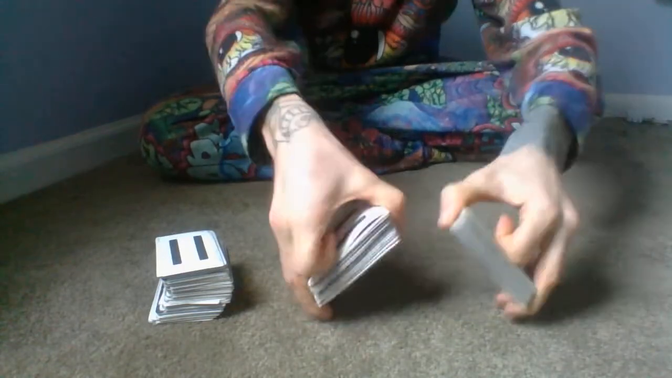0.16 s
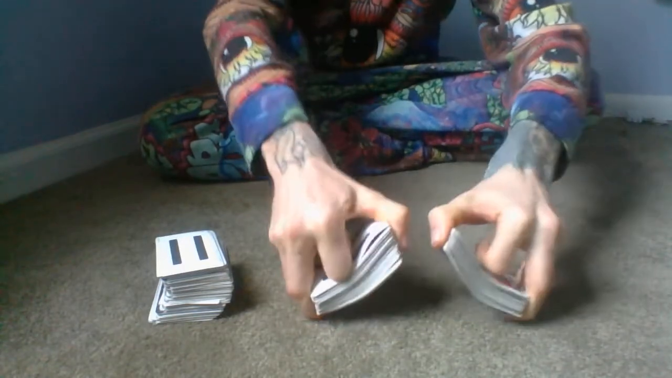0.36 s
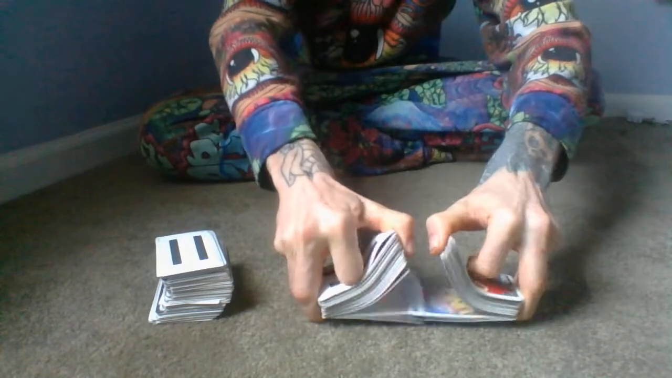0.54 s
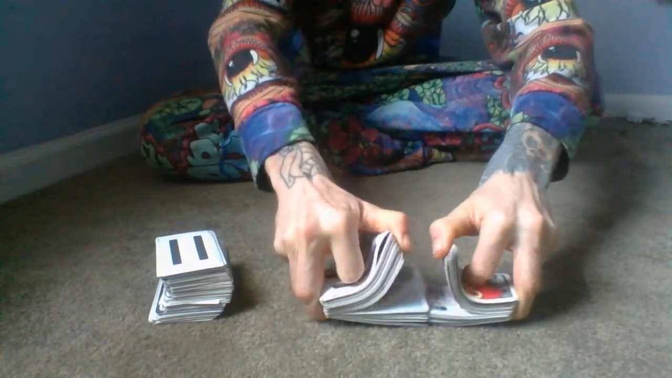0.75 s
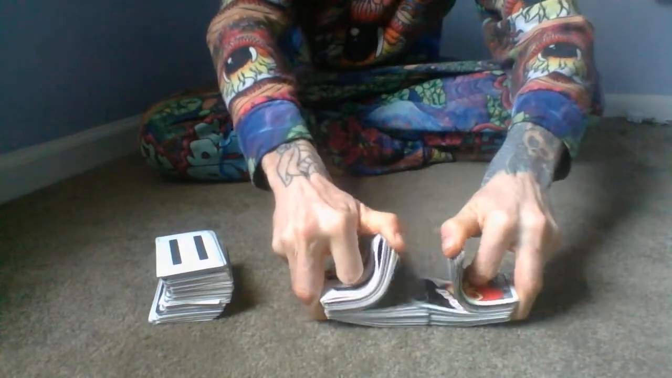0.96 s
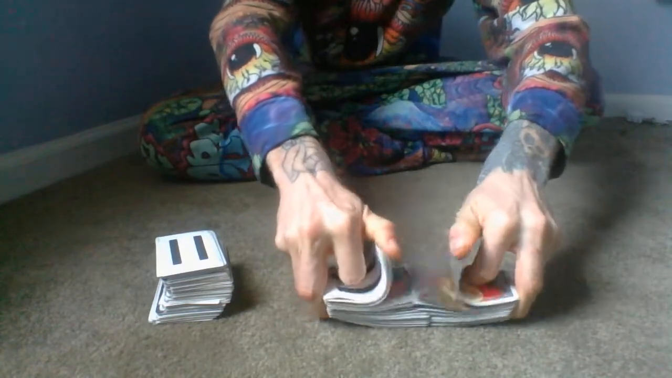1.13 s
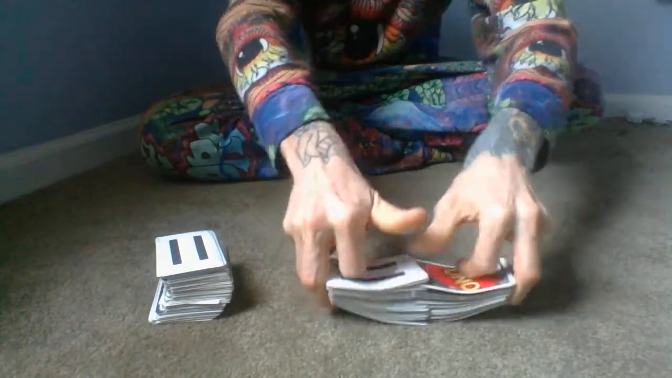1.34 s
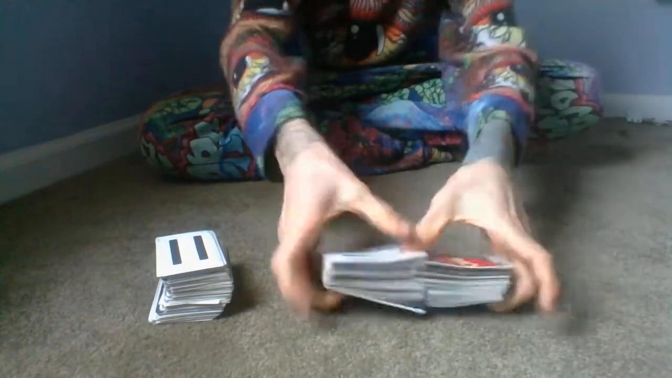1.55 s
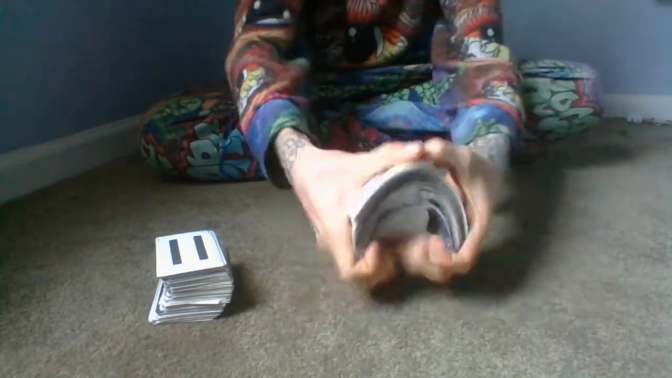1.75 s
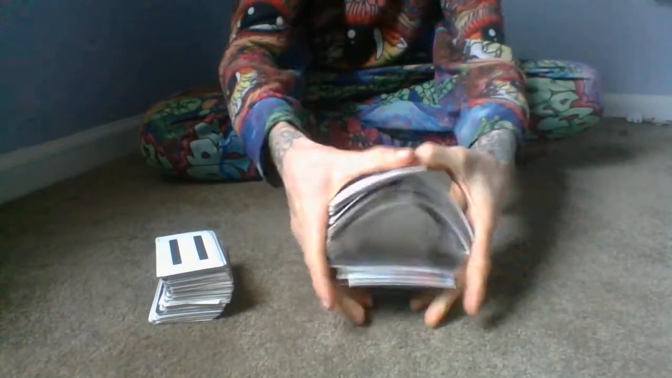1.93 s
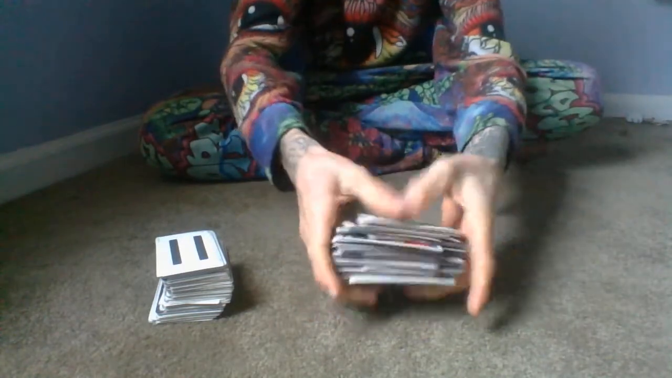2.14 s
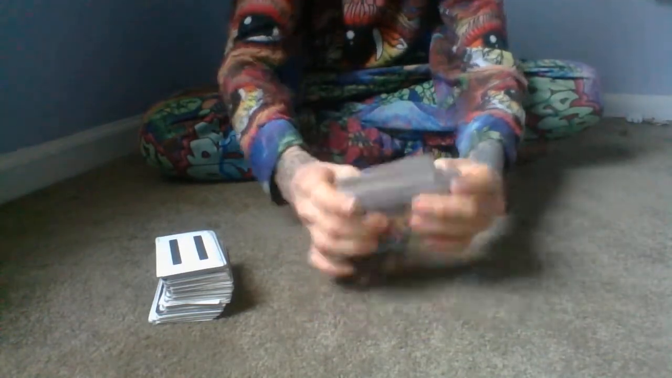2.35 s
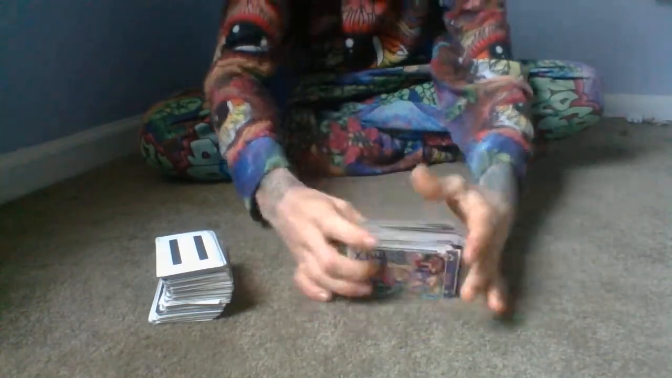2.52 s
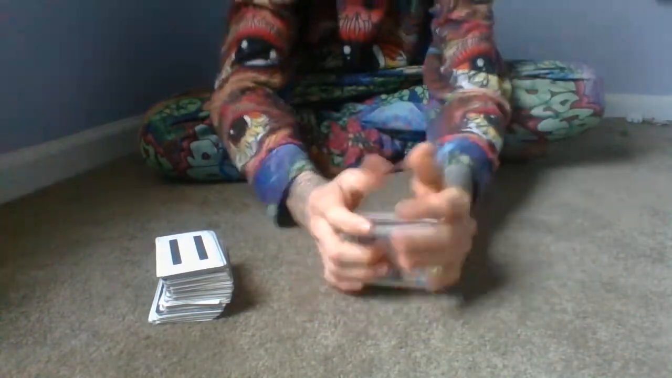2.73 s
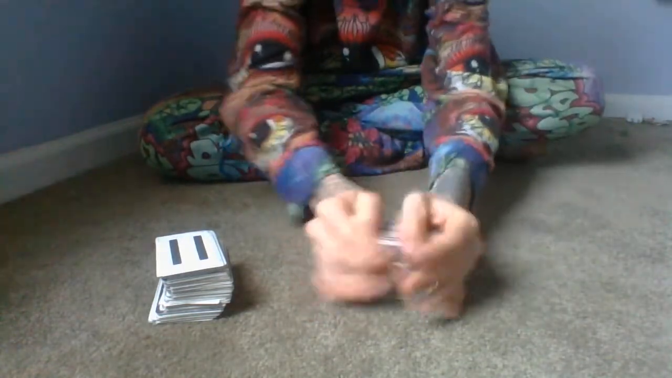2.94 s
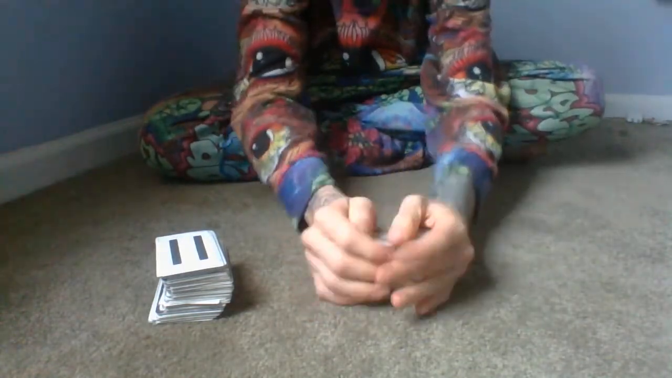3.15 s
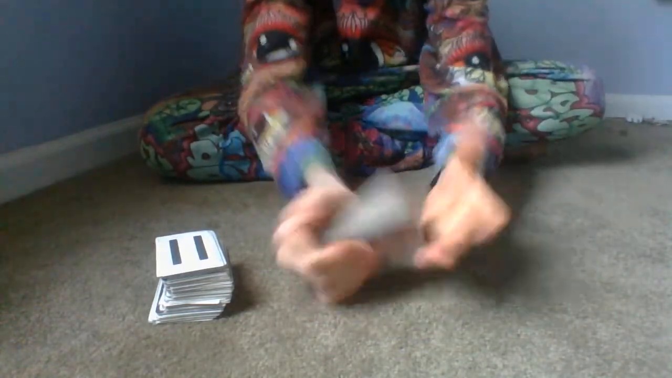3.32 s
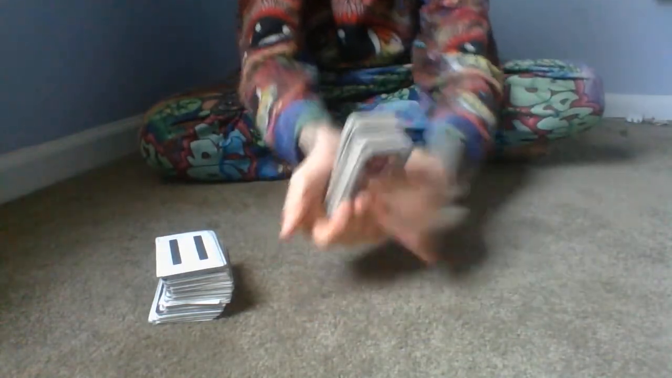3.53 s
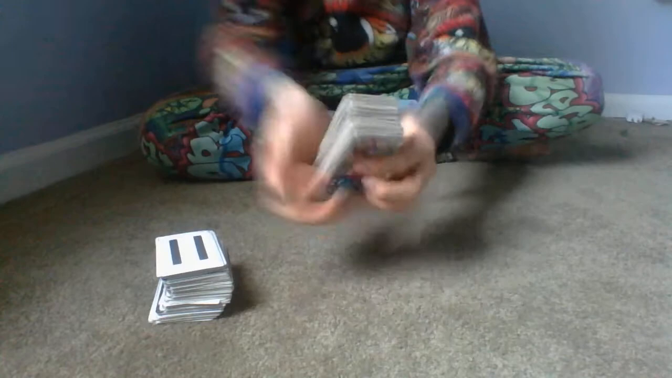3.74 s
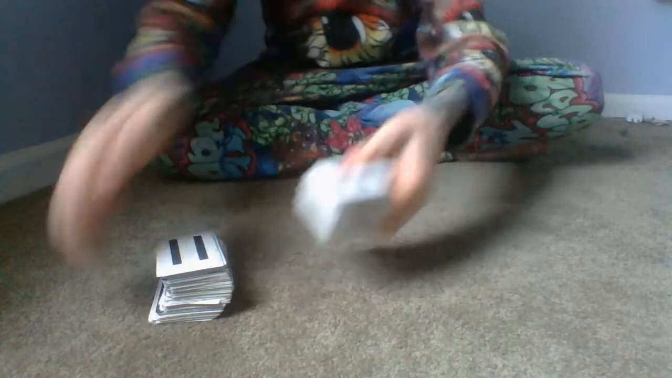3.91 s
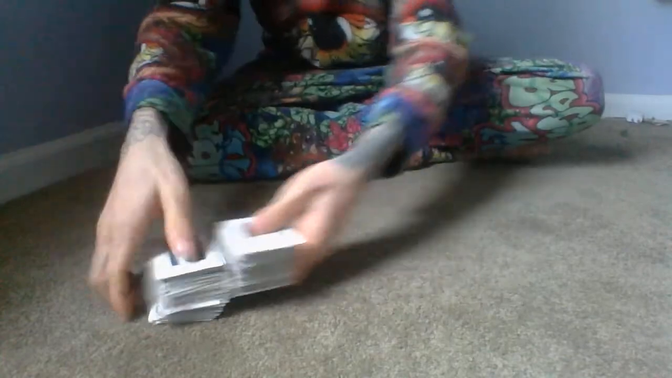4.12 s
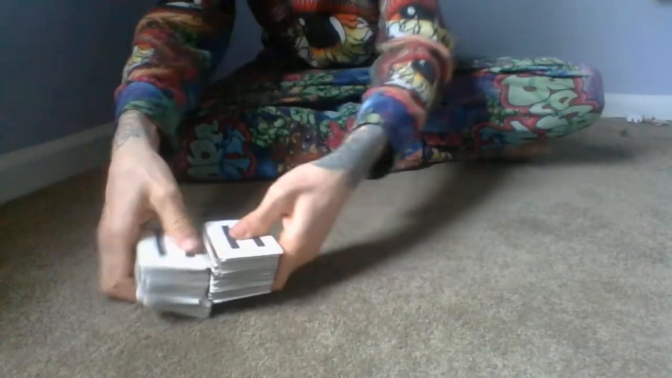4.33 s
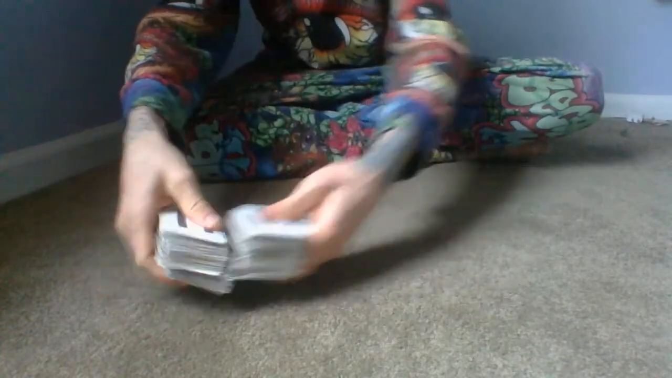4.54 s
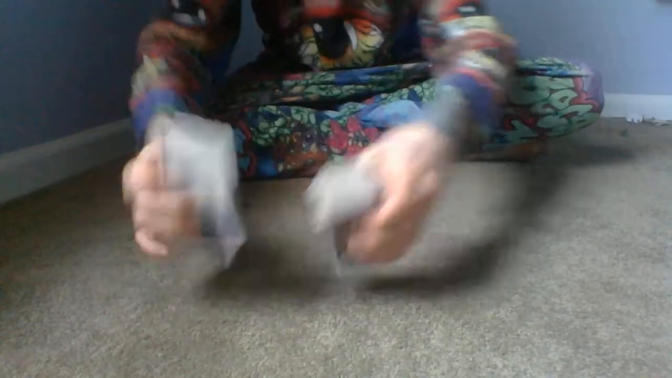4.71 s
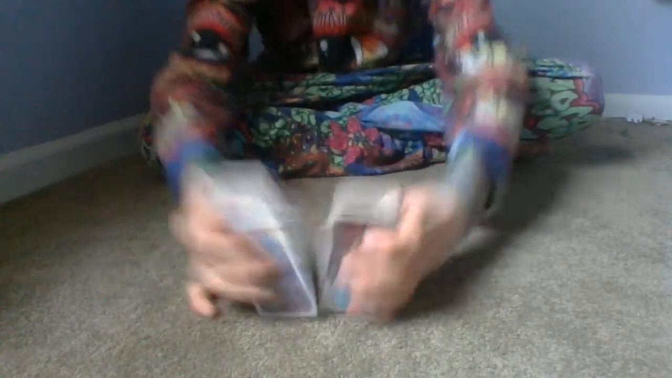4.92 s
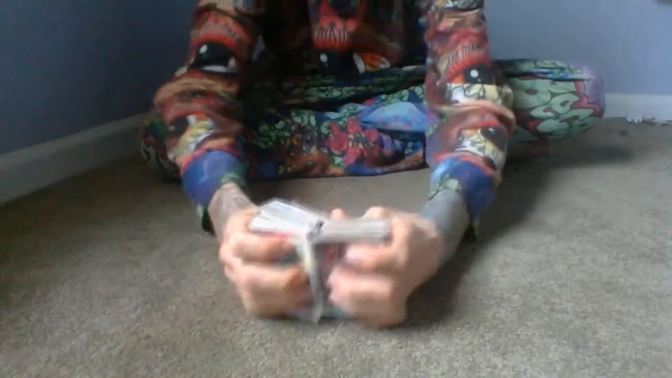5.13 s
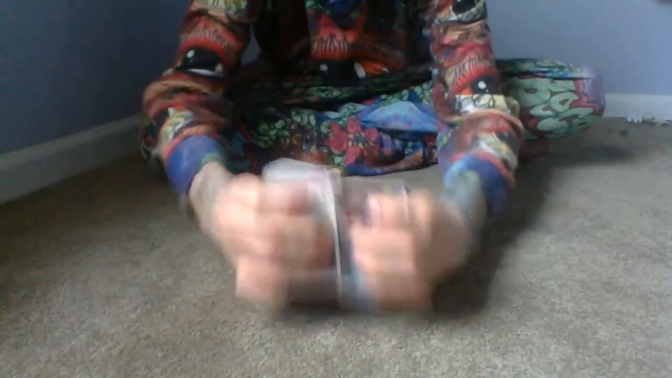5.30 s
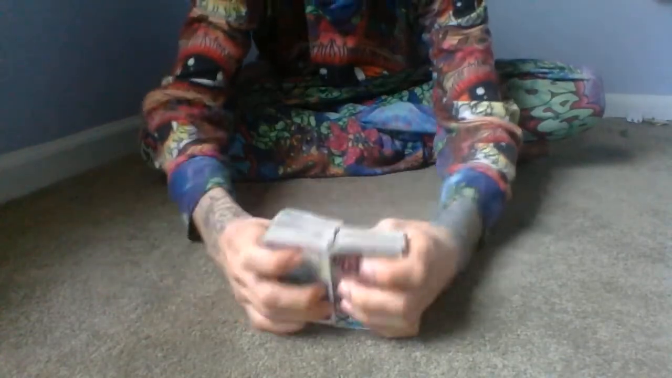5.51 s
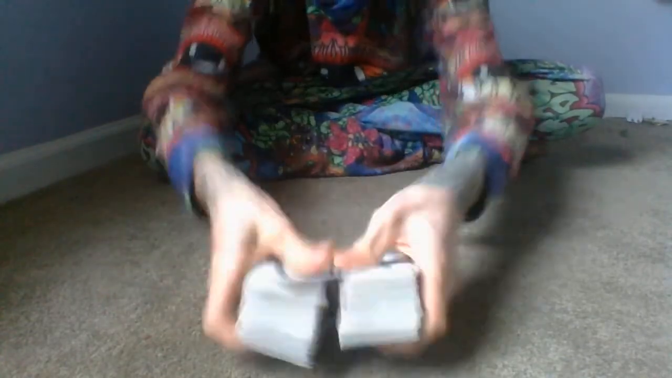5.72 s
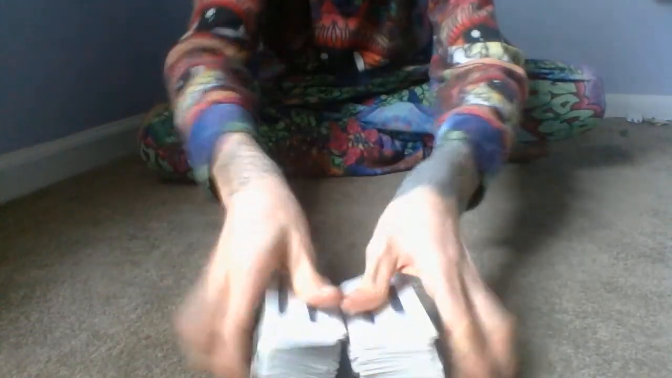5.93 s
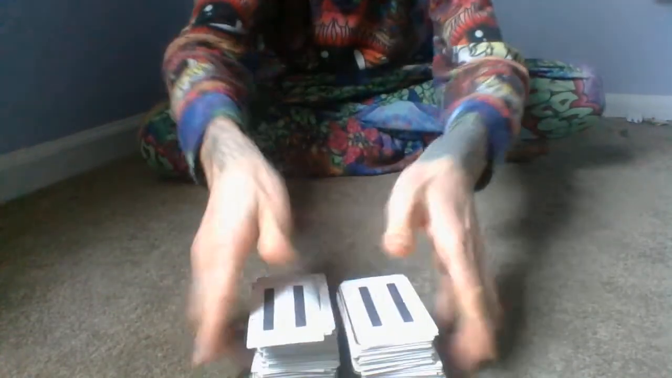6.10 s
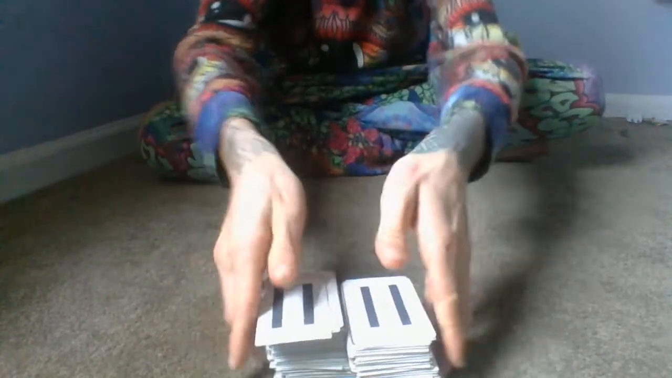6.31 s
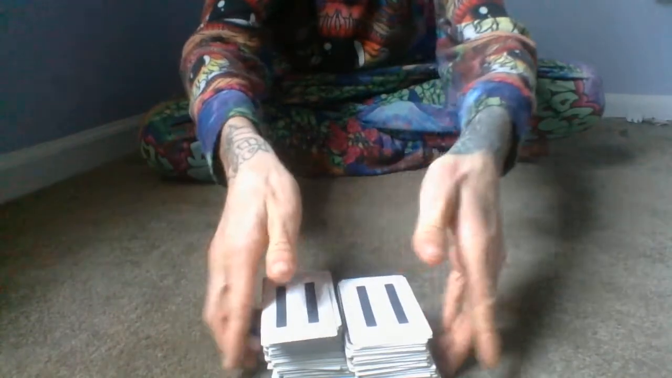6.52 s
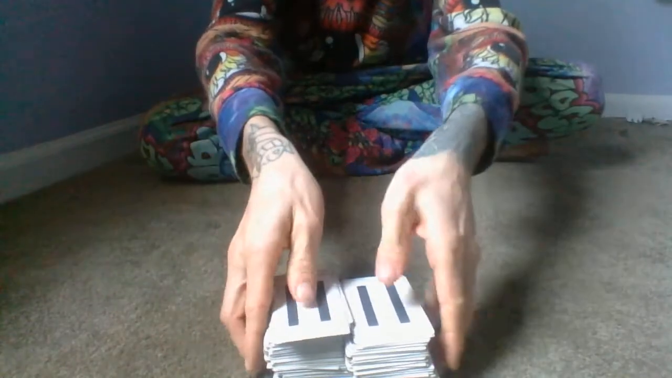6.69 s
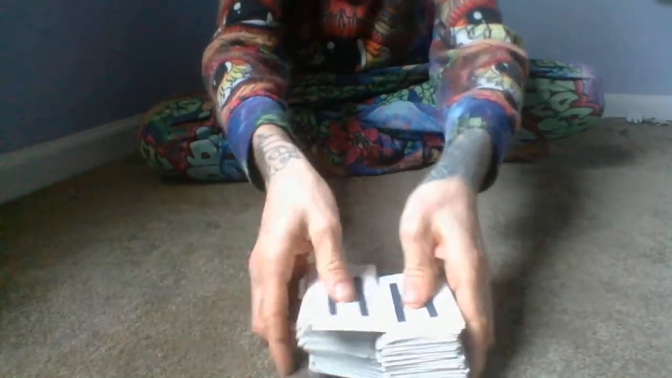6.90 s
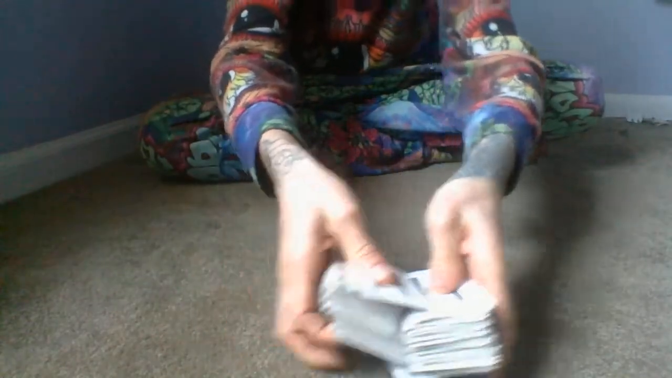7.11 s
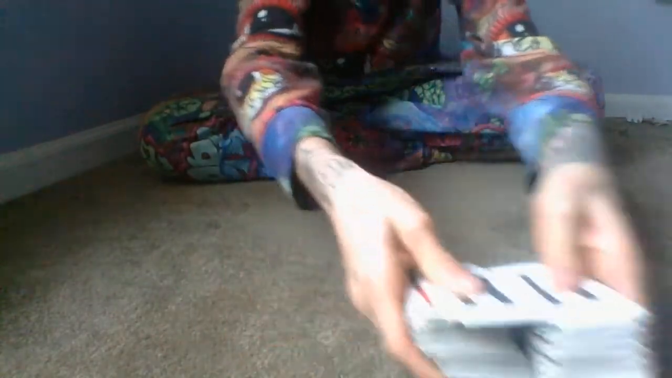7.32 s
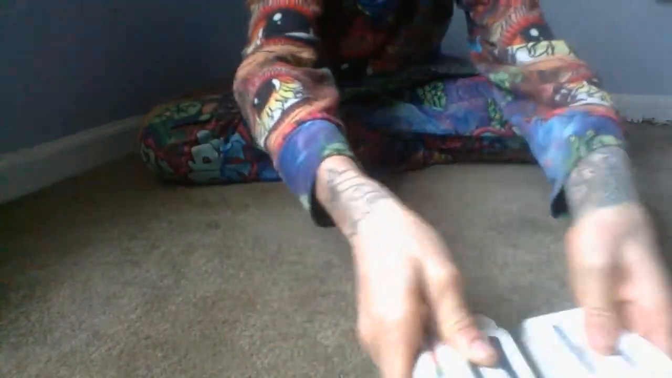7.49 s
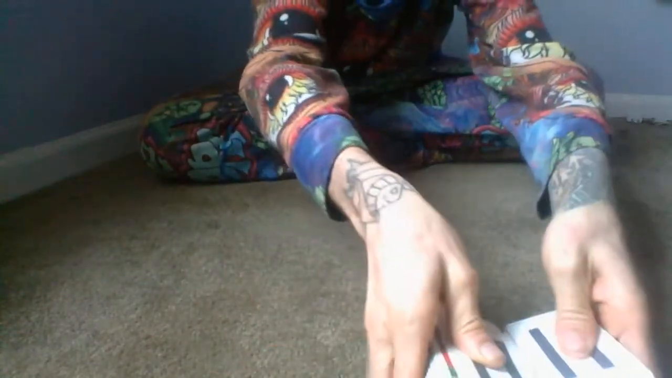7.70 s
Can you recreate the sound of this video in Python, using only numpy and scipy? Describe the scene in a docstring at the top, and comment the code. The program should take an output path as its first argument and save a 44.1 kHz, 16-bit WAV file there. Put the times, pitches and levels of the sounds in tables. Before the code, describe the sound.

A small carpeted room, heard through a thin, bright computer microphone with soft drifting hiss and a faint steady high whine. After a light rub and a few ticks, a thick card deck starts riffling at 0.4 seconds: separate crisp snaps and papery clacks, uneven, growing louder and denser to a peak near 0.95 to 1.1, then stopping by about 1.2. Small slides lead to the bridge at 1.7 to 2.05, an edgy hiss turning into a soft fluttering cascade, quieter than the riffle. From 2.4 onward the handling is sparse and low: dull taps at 2.4, a tick at 3.05, faint slides near 4, a busier cluster of clicks and rubs from 4.9 to 5.9. A firmer packet set-down lands at 6.16, followed by little edge ticks around 7.05 and a last faint slide and knock at 7.6. The whine stutters between 2.5 and 6.2.

```python
"""A small carpeted room: a thick deck of playing cards is riffled on the floor, arched and let fall in a
bridge, then squared, cut and set down. Bursts of contact noise, coloured as cards, make the edges snap, the
faces clack and the packets knock; uneven falls and rubbing noise make the cascades and slides.
Early echoes, a short tail and standing waves place them in the room, the shuffle with more tail than the handling.
A small computer microphone, thin in the bass and peaking near 9 kHz, adds hiss and a faint electrical whine."""
import sys
import numpy as np
from scipy import signal
from scipy.fft import rfft, irfft, next_fast_len
from scipy.io import wavfile
from scipy.ndimage import uniform_filter1d, map_coordinates

SR = 44100
rng = np.random.default_rng(int(sys.argv[2]) if len(sys.argv) > 2 else 0)


def put_to_file(sound):
    """Save the sound as 16-bit audio at rate SR, in the file named by the first command-line argument."""
    columns = np.atleast_2d(sound).T  # one column per channel
    safe = np.clip(columns, -1, 1)
    whole_steps = np.round(safe * 32767)
    wavfile.write(sys.argv[1], SR, whole_steps.astype(np.int16))


N = 341775
TIME = np.arange(N) / SR  # [s]

# "Nominal" levels below are shifted by the trims written where each sound is made.
# The loudest cards leaving the thumbs or the arch:
# (time [s], nominal edge snap [dB], card clack [dB], air slap [dB])
CARD_FLICKS = [(.4037, -37, -31, -44), (0.4271, -33, -37, -34), (0.4555, -48, -47.5, -32.5),
               (0.4642, -34.5, -48, -47.5), (0.4989, -28, -40, -39.5), (0.5112, -31.5, -42.5, -38),
               (0.5516, -19.5, -33.5, -26.5), (.576, -35.5, -41, -38.5), (0.588, -30, -38.5, -34),
               (0.5993, -24, -29.5, -20), (.6236, -30.5, -34, -30), (.6688, -47, -54, -50),
               (0.6829, -39, -46, -37), (0.7217, -36, -41.5, -36), (.743, -37, -36, -36.5),
               (0.75, -14, -24, -28), (0.7912, -22, -28.5, -23), (0.8664, -31, -37.5, -44),
               (0.87, -19, -20.5, -26), (0.9031, -22.5, -28, -33), (0.9289, -30, -38.5, -32.5),
               (.951, -27, -34.5, -23.5), (0.9574, -20.5, -26.5, -21.5), (0.9666, -18, -26.5, -24),
               (.973, -21.5, -19.5, -22.5), (1.0336, -20, -24.5, -27.5), (1.0445, -28, -30, -24.5),
               (1.0537, -18, -21.5, -20), (1.0677, -17, -15.5, -20.5), (1.0742, -18.5, -19, -22.5),
               (1.0888, -27.5, -27.5, -20.5), (1.1016, -19, -29, -25.5), (1.121, -20, -30.5, -20),
               (1.154, -29.5, -36.5, -36.5), (1.7514, -32.5, -52, -60), (1.7632, -29, -38, -40.5),
               (1.8412, -29, -65, -40), (1.8468, -28, -42, -36.5), (1.859, -25.5, -40, -37),
               (1.8852, -21, -27.5, -34), (1.9202, -38, -35.5, -39), (1.9479, -41, -39, -40),
               (1.9692, -32, -37.5, -52), (1.9881, -37.5, -43, -36.5), (2.0023, -40.5, -45, -40),
               (2.0251, -52, -50, -47.5)]
# Packets landing on the carpet or on each other:
# (time [s], nominal edge snap [dB], nominal card clack [dB], nominal knock [dB], knock pitch [Hz])
PACKET_TAPS = [(1.658, -66, -46, -45.5, 1080), (2.4056, -47, -71, -44.5, 393), (2.4145, -45, -65, -41, 414),
               (3.0495, -33.5, -45.5, -52, 1120), (4.09, -69, -79, -43.5, 517),
               (4.4802, -59, -63, -43, 1125), (4.8768, -28.5, -39, -40.5, 740),
               (4.8815, -48, -51, -37, 915), (4.9232, -56, -61, -46.5, 1060),
               (5.0867, -40.5, -47.5, -48, 1114), (5.56, -63, -64, -53.5, 1116),
               (5.5727, -70, -66, -48, 562), (5.6907, -44, -46, -40, 550), (5.7057, -69, -54.5, -68, 1103),
               (5.8582, -42.5, -40.5, -42, 562), (6.1649, -40, -36.5, -36, 1320),
               (6.71, -49.5, -51.5, -45, 432), (6.7472, -50, -70, -49, 412), (7.508, -74, -63, -57.5, 1130),
               (7.5893, -70, -68, -53, 1143)]
# The arched deck cascading shut: (time [s], nominal edge hiss [dB], nominal face flutter [dB])
BRIDGE_LEVELS = [(1.705, -71, -71), (1.724, -42, -55), (1.745, -37, -57), (1.755, -25, -44),
                 (1.78, -42, -45), (1.82, -36, -56), (1.84, -28.5, -45.5), (1.885, -31, -31),
                 (1.93, -40.5, -48), (1.971, -32.5, -42.5), (2.051, -89, -74)]
# More air is slapped out once the arch drops: (time [s], nominal level over the flutter [dB])
BRIDGE_AIR = [(1.83, -9.5), (1.9, 5)]
# Packets sliding into or over each other:
# (centre time [s], half length [s], edge hiss [dB], nominal face rasp [dB])
SLIDE_STROKES = [(0.1, 0.047, -57, -68), (1.406, 0.03, -59, -82), (1.635, 0.036, -49.5, -44.5),
                 (2.41, .012, -45.5, -63), (2.514, .018, -45.5, -52.5), (2.752, 0.017, -59, -60),
                 (3.471, .019, -67, -66), (3.592, 0.019, -70, -59.5), (4.061, 0.073, -72, -61.5),
                 (4.265, .1, -60, -64), (4.705, .04, -69, -67), (4.856, 0.049, -54.5, -68),
                 (4.905, 0.035, -54, -47), (4.961, 0.017, -52, -50.5), (5.33, 0.033, -55.5, -58),
                 (5.558, 0.03, -64, -58), (5.676, 0.027, -48, -62), (5.86, 0.0094, -47, -45),
                 (6.154, 0.025, -49, -50), (6.167, .017, -54, -40), (6.766, 0.044, -51, -54.5),
                 (7.007, .02, -56, -66), (7.135, .032, -60.5, -73), (7.6, 0.023, -62.5, -56)]
# Single card edges ticking before, between and after the shuffles: (time [s], level [dB])
EDGE_TICKS = [(0.1988, -60), (0.325, -58.5), (0.3704, -55), (1.4119, -54.5), (1.6864, -62), (2.5063, -46.5),
              (2.7548, -50), (3.062, -50), (3.6351, -49), (4.1117, -41), (4.9726, -44), (5.08, -46),
              (5.1695, -43.5), (5.1815, -42), (5.7865, -45), (6.3007, -46), (6.831, -55.5), (6.8645, -49),
              (6.976, -54), (6.987, -48), (7.006, -45.5), (7.0409, -35), (7.048, -43), (7.086, -50.5),
              (7.176, -61)]
# Cards slipping between the flicks: (start time [s], end time [s], nominal level [dB])
RIFFLE_TRICKLE = (.39, 1.17, -56.5)
# Cards slipping out with no loud snap:
# (centre time [s], half length [s], nominal edge level [dB], nominal face and air level [dB])
SOFT_SLIP = (0.43, 0.03, -33, -38)
# Fingers keep working the deck: (start time [s], end time [s])
HANDLING_SPAN = (2.1, 7.75)
# Clack limits, set by the longest and shortest free length of a card: (lowest [Hz], highest [Hz])
CLACK_LIMITS = (2100, 3500)

# Relative colours, each (frequency [Hz], level [dB per Hz]):
# a struck card
CARD_COLOUR = [(60, -32.5), (215, -29.5), (285, -24.5), (370, -3), (580, 1), (1170, 1.5), (1430, -7.5),
               (1700, -5.5), (2500, -4.5), (4800, -10.5), (7500, -4.5), (9000, 5.5), (10500, -9.5),
               (15500, -25.5)]
# a whole packet, duller than one card
PACKET_COLOUR = [(60, -36), (230, -12), (400, -1), (1200, -2.5), (1500, -7.5), (2000, -9), (2550, -4),
                 (4800, -12.5), (7400, -6), (9000, 6), (10500, -6), (15500, -33.5)]
# sliding card edges
EDGE_COLOUR = [(2500, -49.5), (4500, -22.5), (6500, -14.5), (8000, -7.5), (9000, 1.5), (10300, -10),
               (12000, -20), (15500, -29)]
# card faces that flutter and rub
FACE_COLOUR = [(150, -49.5), (400, -12), (800, -6), (1150, -0.5), (1430, -6), (1750, -1.5), (2500, 2),
               (3600, -0.5), (5000, -12.5), (8000, -35.5)]
# air slapped out between cards
AIR_COLOUR = [(60, -45), (230, -32), (370, -1), (560, 0.5), (1150, -3.5), (1500, -15), (3000, -33)]
# the steady background
FLOOR_COLOUR = [(110, -44.5), (185, -32.5), (290, -9), (420, 1), (670, -6.5), (790, -5.5), (950, -10),
                (1350, -12.5), (2000, -24), (2600, -21), (5000, -34), (7600, -29.5), (9200, -25.5),
                (11500, -34.5), (16000, -39.5)]

# Decay of the room's tail: (frequency [Hz], time to fall 60 dB [s])
ROOM_DECAY = [(200, 0.1), (1000, 0.28), (3000, 0.32), (9000, 0.22), (15000, 0.11)]
# Early echoes against the direct sound: (delay [s], level [dB])
EARLY_ECHOES = [(.0031, -18.5), (0.0125, -18.5), (0.0149, -24.5), (.0205, -29.5), (0.0305, -27.5)]
# Standing waves, levels relative to one another: (frequency [Hz], level [dB])
STANDING_WAVES = [(581.4, -48.5), (764.4, -46.5), (1071, -45), (1674, -47), (1879, -51), (2256, -53),
                  (2315, -49), (2476, -44.5), (2719, -52), (2772, -51), (3343, -51.5), (3973, -55.5)]

# A card that lands flat clacks low, one that goes edge first higher
EQUAL_CLACK_HZ, EDGE_DB_PER_OCTAVE = 2300, 20  # pitch where snap and clack levels are equal
CLACK_SCATTER = 0.057  # no two cards bend alike [octaves]
RIFFLE_END_S = 1.3  # the thumbs are empty
# The flurry of lesser cards that each flick drags along, with levels nominal and relative to the flick
DRAG_RISE_S, DRAG_FALL_S = 0.004, 0.025
DRAG_EDGE_DB, DRAG_FACE_DB, DRAG_SLAP_DB = -14.5, -11, -12.5
# An ordinary tick barely stirs the packet behind it, which follows by TICK_STIR dB per dB
TICK_USUAL_DB, TICK_STIR = -48, 0.77
USUAL_CLACK_DB, USUAL_KNOCK_DB, TICK_HZ = -62.5, -61, 704
FAINT_TICK_DB, FAINT_SPREAD_DB = -67, 3.5  # stray edges catching: centre and half range
RUSTLE_EDGE_DB, RUSTLE_FACE_DB = -80, -81.5  # faint rubbing, before its swing
RUSTLE_RATE, RUSTLE_SWING_DB = 10, 4.5  # changes of grip a second, and their spread
CATCH_RATE, CATCH_DB = 260, 4  # catch and slip: changes a second, and their spread
FLOOR_DB = -62.5  # background level, before its slow drift
TOP_HZ = 16000  # upper band limit


def amp(db):
    """Decibels to gain."""
    return 10 ** (np.asarray(db) / 20)


def unit(x):
    """Scale to rms 1."""
    return x / np.sqrt(np.mean(x ** 2) + 1e-20)


def along(points, hz):
    """Read (frequency [Hz], value) points on a log frequency axis."""
    f, v = np.transpose(points)
    return np.interp(np.log(hz + 1), np.log(f + 1), v)


def filtered(x, response):
    """Filter x by a zero-phase gain that is a function of frequency."""
    m = next_fast_len(N + SR // 2)
    return irfft(rfft(x, m) * response(np.fft.rfftfreq(m, 1 / SR)), m)[:N]


def coloured(x, spectrum):
    """Give noise a spectrum, at rms 1."""
    return unit(filtered(x, lambda hz: amp(along(spectrum, hz))))


def impulse_of(spectrum, size=2048):
    """The causal impulse response with this spectrum, by folding its cepstrum (minimum phase)."""
    cepstrum = irfft(np.log(amp(along(spectrum, np.fft.rfftfreq(size, 1 / SR)))))
    cepstrum[1:size // 2] *= 2
    cepstrum[size // 2 + 1:] = 0
    return irfft(np.exp(rfft(cepstrum)))[:size // 2]


def band(x, lo_hz, hi_hz, order=3):
    """Causal band-pass, kept below the Nyquist frequency."""
    edges = [lo_hz, min(hi_hz, SR / 2 - 500)]
    return signal.sosfilt(signal.butter(order, edges, "band", fs=SR, output="sos"), x)


def wobble(rate):
    """A random curve of straight segments, rate knots a second."""
    knots = rng.standard_normal(int(N * rate / SR) + 4)
    return map_coordinates(knots, [TIME * rate], order=1)


def add(track, s, sound):
    """Mix a sound into a track at s seconds."""
    part = track[int(s * SR):][:len(sound)]
    part += sound[:len(part)]


def contact(body, life, chatter):
    """One sharp push and a chatter of tiny contacts dying over life seconds, heard through the body."""
    t = np.arange(SR // 25) / SR
    force = chatter * rng.standard_normal(len(t)) * np.exp(-t / life)
    force[0] += 1
    return signal.fftconvolve(force, body)[:len(t)]


def at_level(sound, db):
    """Give a short sound the energy of 5 ms at this rms level."""
    return amp(db) * sound * np.sqrt(SR / 200 / np.sum(sound ** 2))


def flicks():
    """A card's edge scrapes off its neighbour and snaps free; its face clacks and slaps out air."""
    out = np.zeros(N)
    card = impulse_of(CARD_COLOUR)
    for s, snap_db, clack_db, slap_db in CARD_FLICKS:
        octaves = (snap_db - clack_db) / EDGE_DB_PER_OCTAVE
        clack_hz = np.clip(EQUAL_CLACK_HZ * 2 ** octaves, *CLACK_LIMITS)
        clack_hz *= 2 ** (CLACK_SCATTER * rng.standard_normal())
        scrape = band(contact(card, life=0.0024, chatter=1.8), 3300, 18950)
        scrape = at_level(scrape, snap_db - 18.0)[::-1]  # reversed: it grows until the snap
        snap = band(contact(card, life=0.00086, chatter=0.43), 3100, 23000)
        snap = at_level(snap, snap_db + 0.68)
        flex = band(contact(card, life=0.0016, chatter=0.33), 1500, 4000)
        bending = band(flex, clack_hz / 1.08, clack_hz * 0.99, order=1)
        clack = at_level(0.95 * flex + bending, clack_db)
        slap = band(contact(card, life=0.0022, chatter=0.43), 30, 1450)
        slap = at_level(slap, slap_db)
        add(out, s - len(scrape) / SR, scrape)
        add(out, s, snap + clack + slap)
    return out


def riffle_flow():
    """Nominal levels (edge, face, slap [dB]) of lesser cards: a trickle, a soft run, a flurry per flick."""
    start, end, trickle_db = RIFFLE_TRICKLE
    centre, half, edge_db, face_db = SOFT_SLIP
    trickle = amp(trickle_db) * ((TIME > start) & (TIME < end))
    soft_swell = np.exp(-((TIME - centre) / half) ** 2)
    soft_run = np.outer(amp([edge_db, face_db, face_db]), soft_swell)
    power = trickle ** 2 + soft_run ** 2
    riffling = slice(0, int(RIFFLE_END_S * SR))
    for s, snap_db, clack_db, slap_db in CARD_FLICKS:
        if s < RIFFLE_END_S:
            age = TIME[riffling] - s
            flurry = np.exp(np.minimum(age / DRAG_RISE_S, -age / DRAG_FALL_S))
            sizes = amp([snap_db + DRAG_EDGE_DB, clack_db + DRAG_FACE_DB, slap_db + DRAG_SLAP_DB])
            power[:, riffling] += np.outer(sizes, flurry) ** 2
    return 10 * np.log10(power + 1e-12)


def bridge_flow():
    """Nominal levels (edge, face, slap [dB]) of the bridge: edges hiss first, then faces fall flat."""
    s, *columns = np.transpose(BRIDGE_LEVELS)
    edge_db, face_db = [np.interp(TIME, s, db, left=-120, right=-120) for db in columns]
    air_db = face_db + np.interp(TIME, *np.transpose(BRIDGE_AIR))
    return edge_db, face_db, air_db


def cascade(flow, rate, spread_db, life, smooth, hiss_db, flutter_db, slap_db):
    """Cards fall unevenly, rate a second: each one rubs along its neighbour and lands with a little slap."""
    edge_db, face_db, air_db = flow
    turns = np.arange(int(rate * N / SR))
    times = (turns + rng.random(len(turns))) / rate
    sizes = amp(spread_db * np.clip(rng.standard_normal(len(times)), -2, 2))
    landings = np.bincount((times * SR).astype(int), sizes, N)[:N]
    # each landing presses the cards together, and the force dies over life seconds
    contact_force = unit(signal.lfilter([1], [1, -np.exp(-1 / (life * SR))], landings))
    rub = rng.standard_normal(N) * (contact_force + smooth)
    air_push = landings - landings.mean() + 0.15 * contact_force * rng.standard_normal(N)
    slaps = unit(signal.fftconvolve(air_push, impulse_of(AIR_COLOUR))[:N])
    edges = amp(edge_db + hiss_db) * coloured(rub, EDGE_COLOUR)
    faces = amp(face_db + flutter_db) * coloured(rub, FACE_COLOUR)
    return edges + faces + amp(air_db + slap_db) * slaps


def taps():
    """A packet lands: its edges tick and the damped stack knocks, lower the softer it is held."""
    out = np.zeros(N)
    packet = impulse_of(PACKET_COLOUR)
    for s, snap_db, clack_db, knock_db, knock_hz in PACKET_TAPS:
        brush = band(contact(packet, life=0.0056, chatter=2), 490, 14000)
        brush = at_level(brush, snap_db - 15.5)[::-1]  # loose cards touch first, growing to the landing
        snap = band(contact(packet, life=0.0012, chatter=0.54), 5000, 22000)
        snap = at_level(snap, snap_db - 0.5)
        clack = band(contact(packet, life=0.0031, chatter=0.36), 1660, 4630)
        clack = at_level(clack, clack_db - 0.5)
        push = contact(packet, life=0.004, chatter=0.19)
        knock = band(push, knock_hz / 1.086, knock_hz * 1.135, order=1)
        knock = at_level(knock, knock_db + 0.22)
        thud = at_level(band(push, 29.7, 222, order=2), knock_db - 34)  # the carpeted floor gives a little
        add(out, s - len(brush) / SR, brush)
        add(out, s, snap + clack + knock + thud)
    return out


def ticks(count):
    """One edge ticks and barely stirs the packet behind it; count fainter ones catch at random."""
    out = np.zeros(N)
    packet = impulse_of(PACKET_COLOUR)
    stray = []
    for u, v in rng.random((count, 2)):
        stray_s = np.interp(u, [0, 1], HANDLING_SPAN)
        stray.append((stray_s, FAINT_TICK_DB + FAINT_SPREAD_DB * (2 * v - 1)))
    for s, db in list(EDGE_TICKS) + stray:
        stir_db = TICK_STIR * (db - TICK_USUAL_DB)
        snap = at_level(band(contact(packet, life=0.00068, chatter=0.26), 4840, 18000), db)
        clack = band(contact(packet, life=0.002, chatter=0.4), 1600, 4900)
        clack = at_level(clack, USUAL_CLACK_DB + stir_db)
        push = contact(packet, life=0.003, chatter=0.22)
        knock = band(push, TICK_HZ / 1.7, TICK_HZ * 1.6, order=1)
        knock = at_level(knock, USUAL_KNOCK_DB + stir_db)
        add(out, s, snap + clack + knock)
    return out


def crackle(rate, spread_db, smooth):
    """Random tiny catches of uneven size, rate a second, on a bed of smooth friction noise."""
    sizes = amp(spread_db * np.clip(rng.standard_normal(N), -2, 2)) * rng.choice([-1, 1], N)
    catches = unit(sizes * (rng.random(N) < rate / SR))
    return catches + smooth * rng.standard_normal(N)


def friction():
    """Sliding cards catch and slip, so their crackle swells and sinks quickly."""
    catch_and_slip = amp(CATCH_DB * np.clip(wobble(CATCH_RATE), -2, 2))
    return crackle(rate=2500, spread_db=2.0, smooth=1.43) * catch_and_slip


def slides():
    """Strokes swell and fade with the speed of the hand; fingers rustle at random while they work the deck."""
    working = (TIME > HANDLING_SPAN[0]) & (TIME < HANDLING_SPAN[1])
    grip = working * amp(RUSTLE_SWING_DB * np.clip(wobble(RUSTLE_RATE), -2, 1.5))
    edge = amp(RUSTLE_EDGE_DB) * grip
    face = amp(RUSTLE_FACE_DB) * grip
    for s, half, edge_db, face_db in SLIDE_STROKES:
        near = slice(max(int((s - 3 * half) * SR), 0), int((s + 3 * half) * SR))
        speed = np.exp(-2 * ((TIME[near] - s) / half) ** 2)
        edge[near] += amp(edge_db) * speed
        face[near] += amp(face_db - 9.0) * speed
    return edge * coloured(friction(), EDGE_COLOUR) + face * coloured(friction(), FACE_COLOUR)


def room(x, tail_db, modes_db, modes_t60):
    """Ceiling and walls echo early, a few standing waves ring on, and the carpet keeps the tail short."""
    hz, t, z = signal.stft(rng.standard_normal(SR // 2), SR, nperseg=256)
    decay = amp(-60 * t / along(ROOM_DECAY, hz)[:, None])
    tail = signal.istft(z * decay, SR, nperseg=256)[1]
    t = np.arange(len(tail)) / SR
    tail *= 1 - np.exp(-(t / 0.0068) ** 2)  # the tail builds up over some milliseconds
    ring = sum(amp(db) * np.cos(2 * np.pi * mode_hz * t) for mode_hz, db in STANDING_WAVES)
    ring = ring * amp(-60 * t / modes_t60)
    answer = amp(tail_db) * tail / np.linalg.norm(tail) + amp(modes_db) * ring / np.linalg.norm(ring)
    for delay, db in EARLY_ECHOES:
        answer[int(delay * SR)] += amp(db)
    return x + signal.fftconvolve(x, answer)[:N]


def background():
    """Room rush and microphone hiss, drifting slowly in level, with the electrical whine."""
    level = amp(FLOOR_DB + 0.97 * wobble(5.2))
    return level * coloured(rng.standard_normal(N), FLOOR_COLOUR) + whine(hz=3128, db=-76.5)


def whine(hz, db):
    """A faint electrical whine in the microphone: a sine that stutters on and off for a few seconds."""
    cycle = np.cos(2 * np.pi * (TIME - 2.943) / 0.06017)  # stutter period [s]
    steady = (TIME < 2.47) | (TIME > 6.24)
    gate = uniform_filter1d((steady | (cycle > 0)).astype(float), size=90)  # soft edges, about 2 ms
    return amp(db) * gate * unit(np.sin(2 * np.pi * hz * TIME))


def scene():
    """Riffle, bridge and squaring; the small handling sounds have a fainter, shorter room tail."""
    riffle = cascade(riffle_flow(), rate=150, spread_db=4.0, life=0.0014, smooth=0.27,
                     hiss_db=-6, flutter_db=-3.0, slap_db=-5.5)
    bridge = cascade(bridge_flow(), rate=220, spread_db=2.5, life=0.0032, smooth=1.0,
                     hiss_db=-2.0, flutter_db=-2.5, slap_db=-3.0)
    shuffle = room(flicks() + riffle + bridge, tail_db=-13.0, modes_db=-23.0, modes_t60=0.24)
    handling = room(taps() + ticks(count=24) + slides(), tail_db=-20.5, modes_db=-21.5, modes_t60=0.13)
    return (shuffle + handling + background())[None]


def record(dry):
    """Peaks beyond full scale are clipped, then a steep low-pass closes the top of the band."""
    clipped = np.clip(dry[0], -1, 1)
    return filtered(clipped, lambda hz: 1 / np.sqrt(1 + (hz / TOP_HZ) ** 120))[None]


dry = scene()
out = record(dry)
put_to_file(out)
```